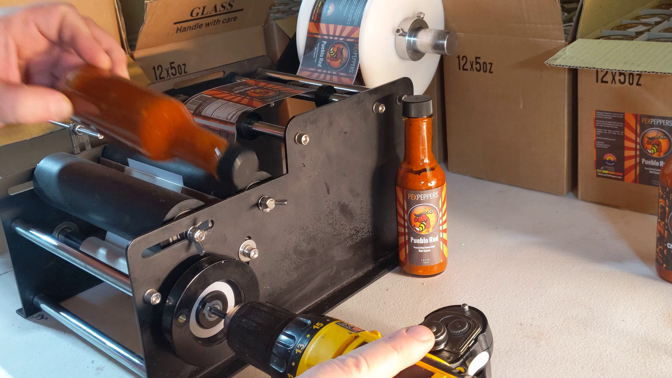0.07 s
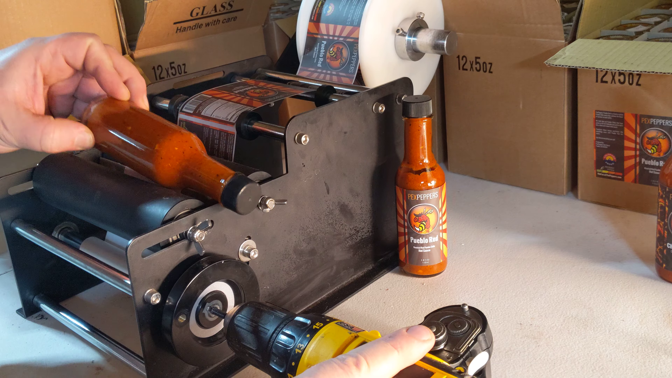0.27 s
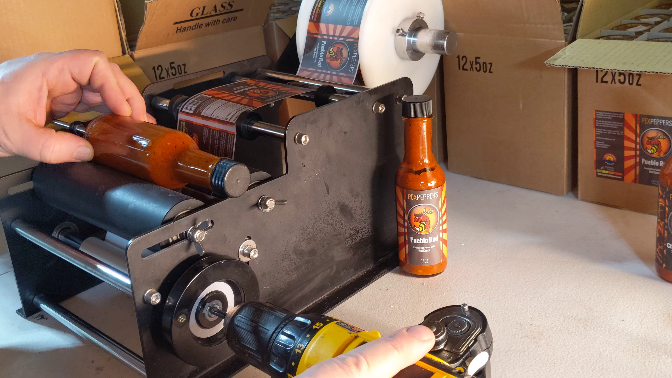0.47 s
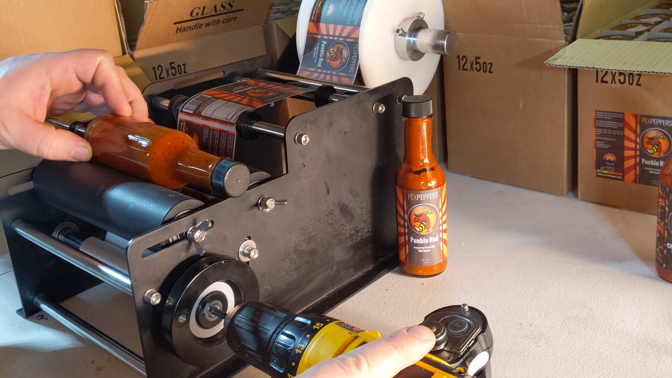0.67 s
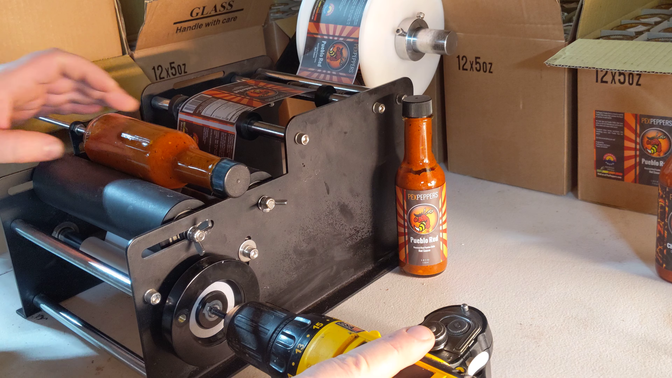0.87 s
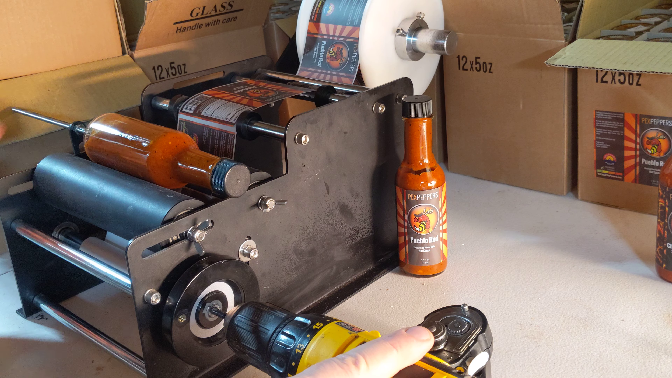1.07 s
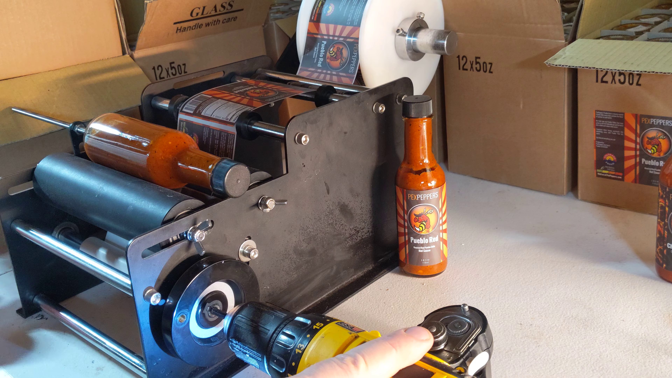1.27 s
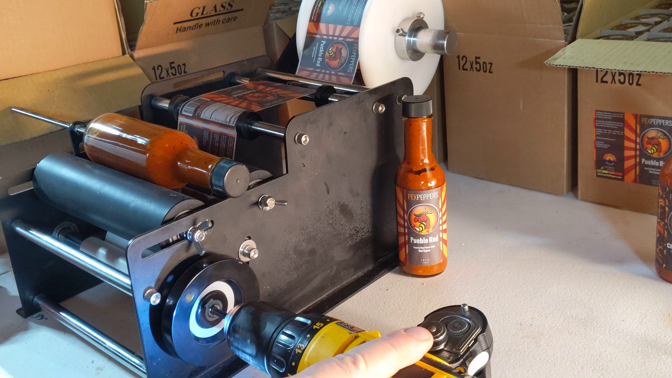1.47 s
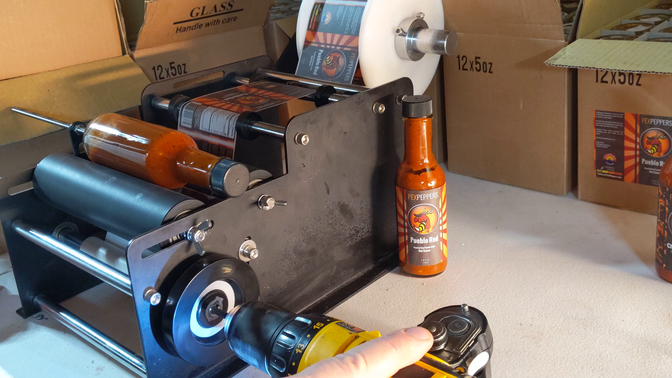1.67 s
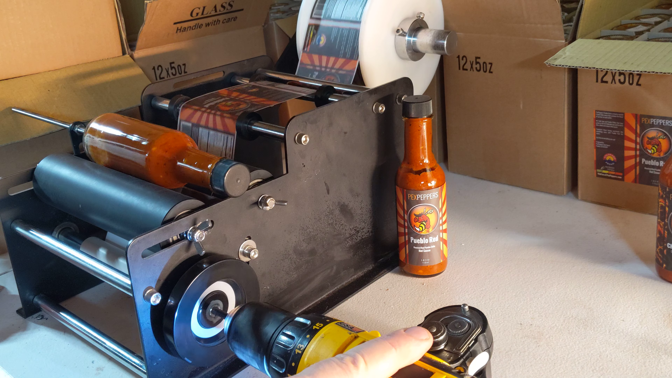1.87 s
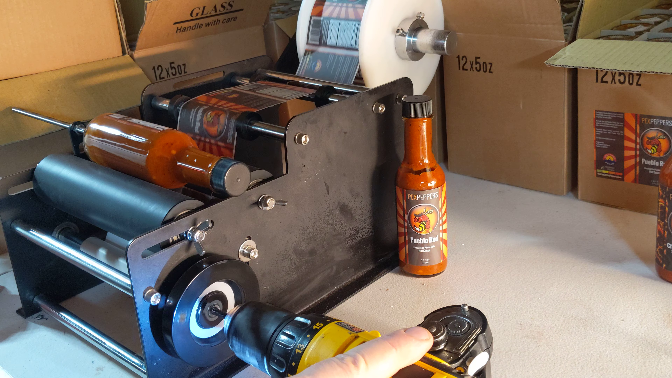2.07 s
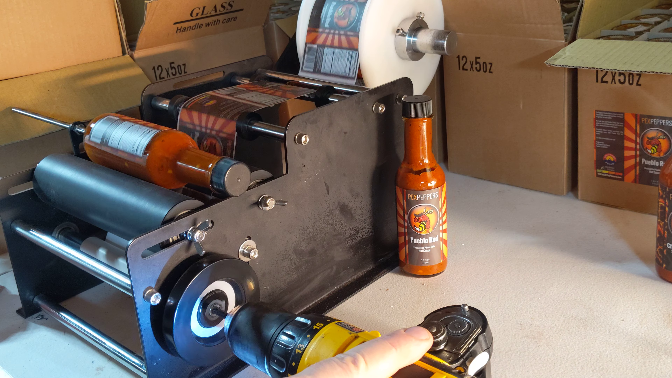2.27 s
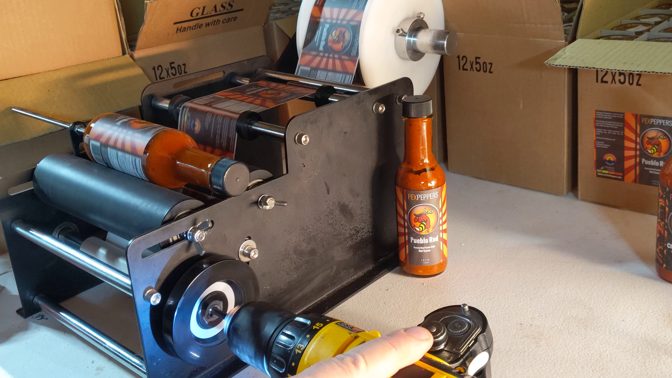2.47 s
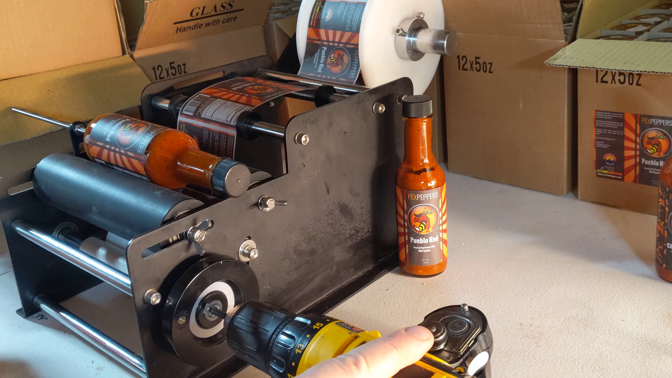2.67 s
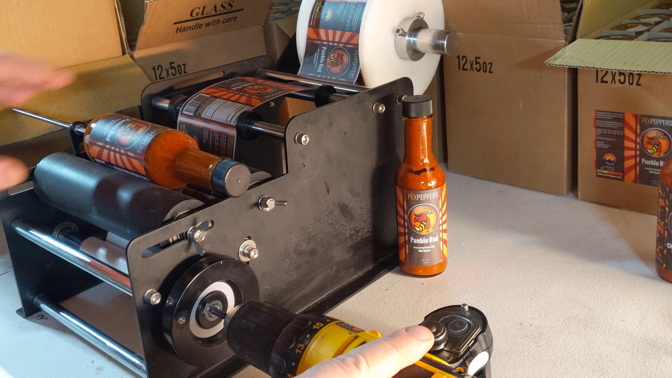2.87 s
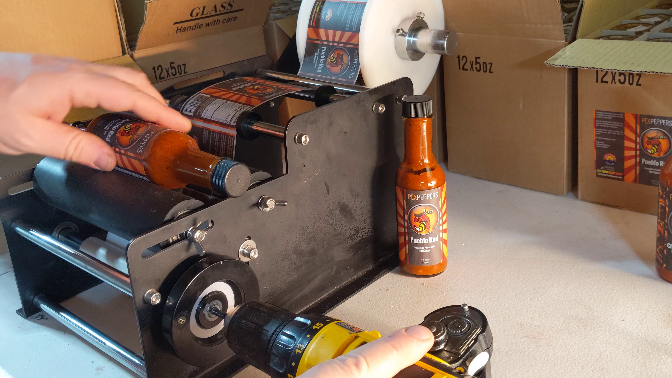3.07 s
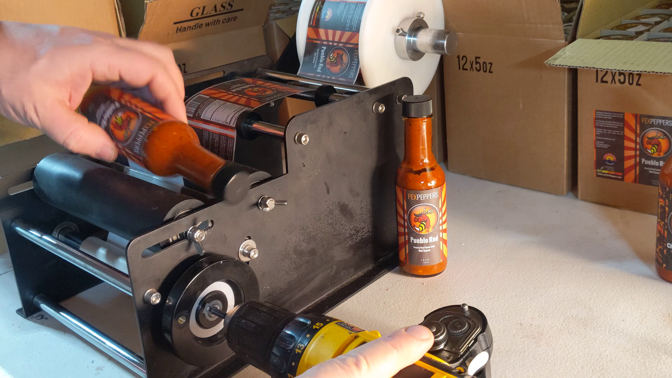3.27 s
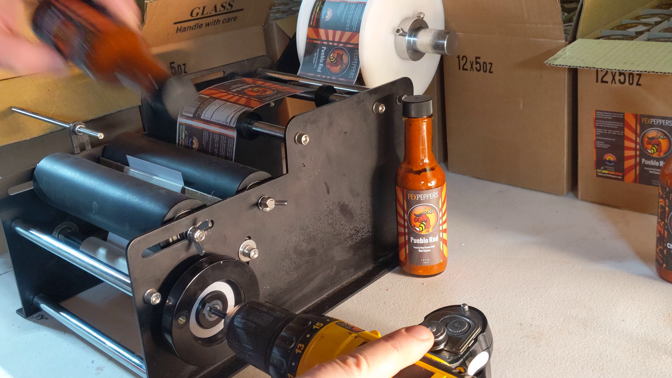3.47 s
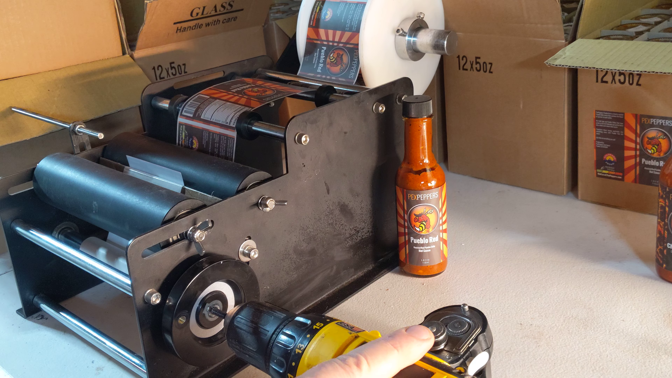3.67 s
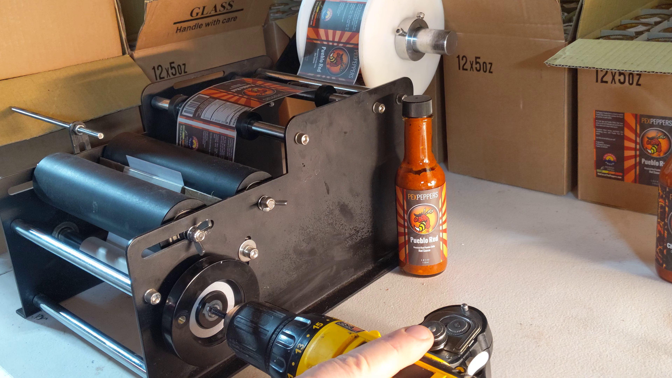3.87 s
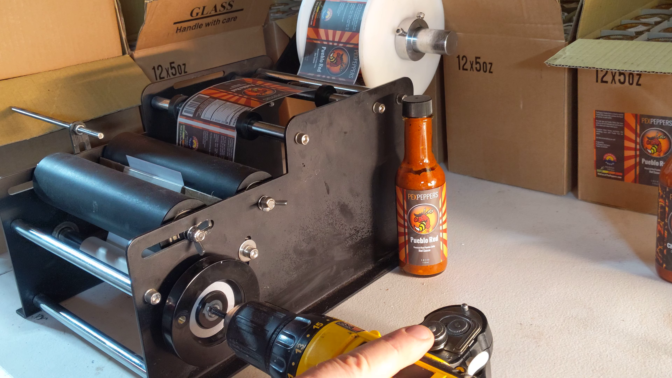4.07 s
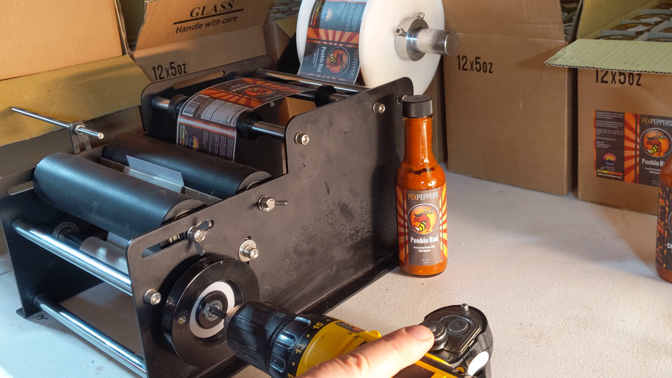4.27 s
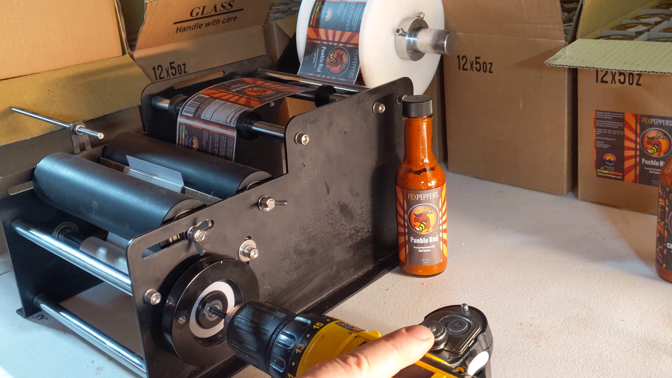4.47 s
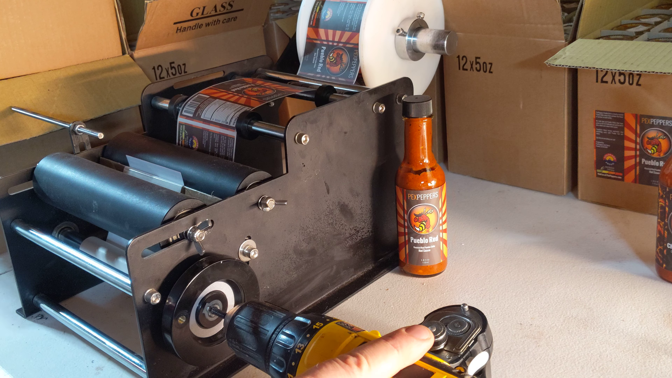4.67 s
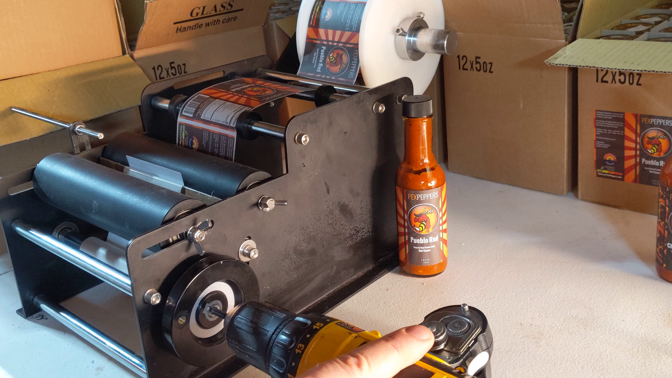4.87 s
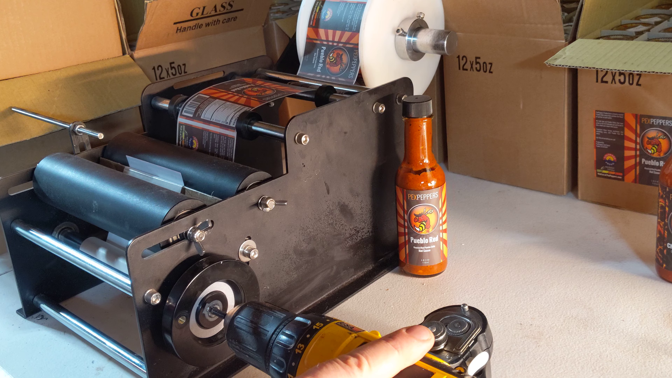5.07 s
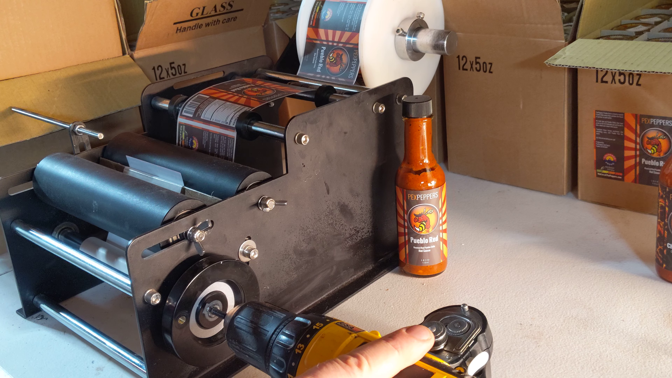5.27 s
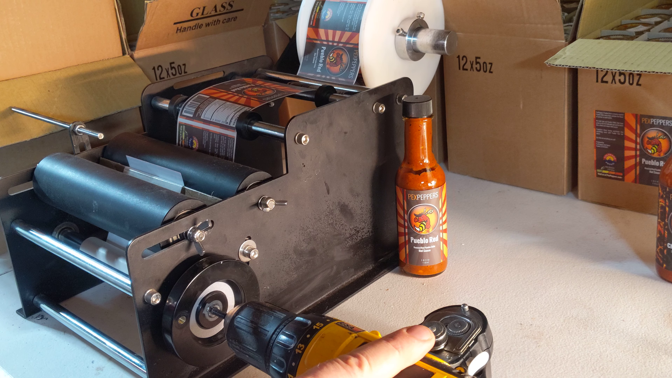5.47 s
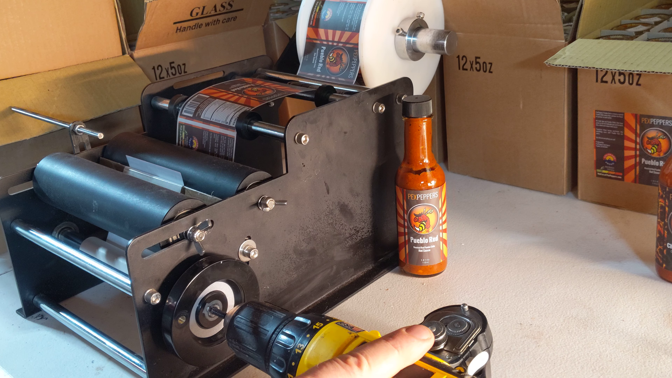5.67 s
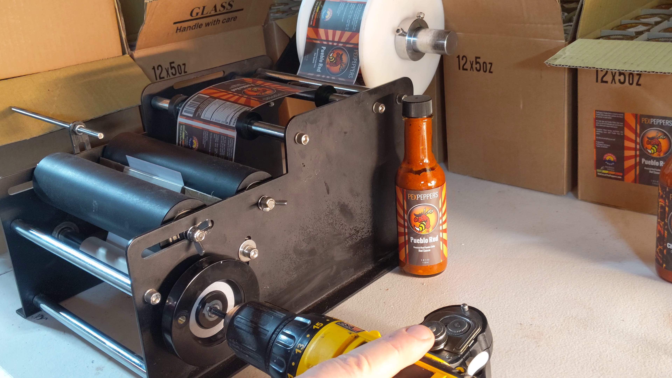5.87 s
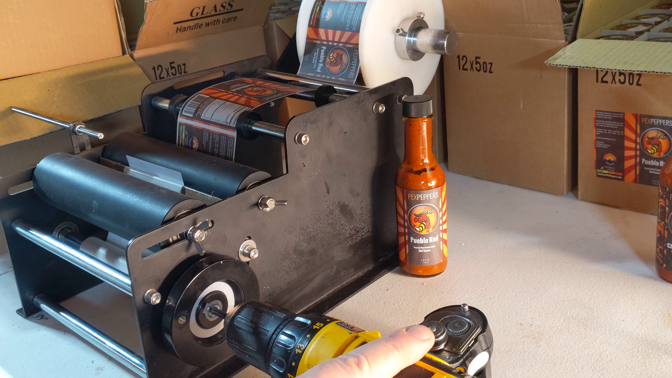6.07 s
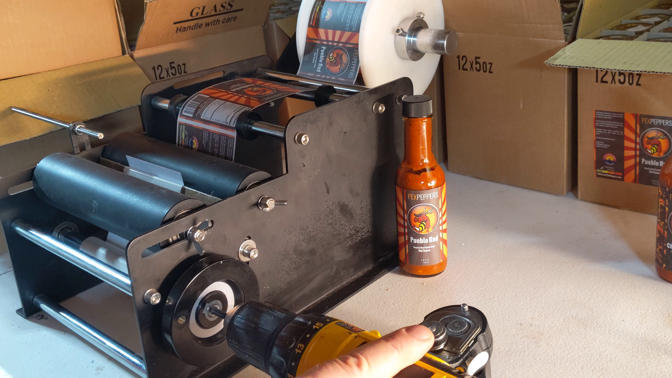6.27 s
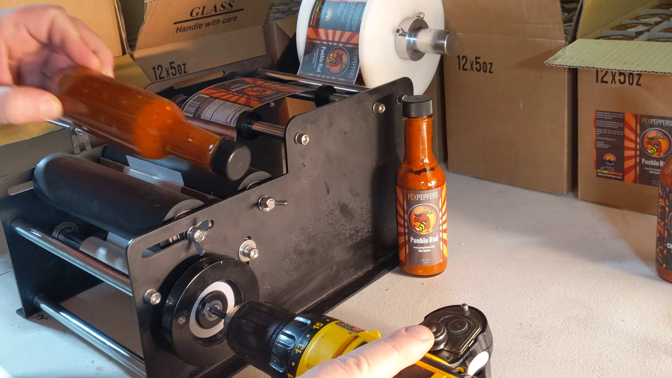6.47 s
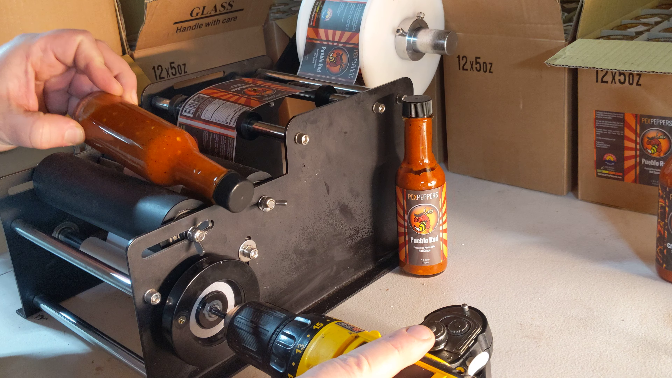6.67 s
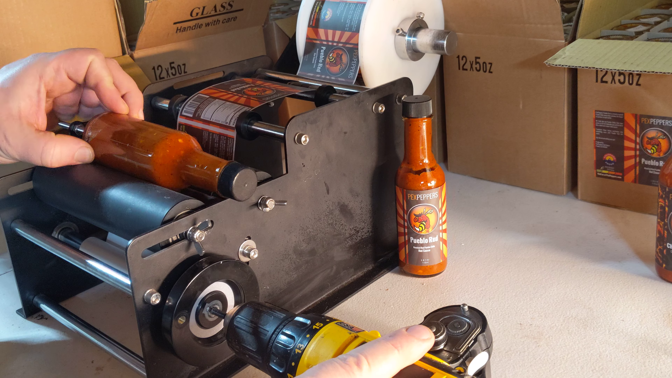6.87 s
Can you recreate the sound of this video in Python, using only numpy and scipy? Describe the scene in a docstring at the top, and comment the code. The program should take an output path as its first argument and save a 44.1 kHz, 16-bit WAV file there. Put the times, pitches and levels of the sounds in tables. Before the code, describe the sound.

A glass bottle knocks several times onto rollers in a steel frame. A cordless drill ticks and runs gently for about a second, a blip and then a longer squeeze, with a high whine over grinding gears. A sharp knock follows, then a bottle bumps and slides in a cardboard box to the left. Two more knocks on the rollers come near the end. Close microphone, small room with a faint hum.

```python
"""Drill-driven bottle labeller

Indoors at a table, close up on two microphone ports, in a small room with a faint hum. A cordless drill,
squeezed gently, turns the rubber rollers of a small labelling frame; its speed switch whines over motor
and gear noise. Glass bottles knock and slide on the rollers and, off to the left, in a carton."""
import sys
import numpy as np
from scipy import signal
from scipy.fft import rfft, irfft, next_fast_len
from scipy.io import wavfile
from scipy.ndimage import uniform_filter1d

SR = 44100
rng = np.random.default_rng(int(sys.argv[2]) if len(sys.argv) > 2 else 0)


def put_to_file(sound):
    """Save the sound as 16-bit audio at rate SR, in the file named by the first command-line argument."""
    columns = np.atleast_2d(sound).T  # one column per channel
    safe = np.clip(columns, -1, 1)
    whole_steps = np.round(safe * 32767)
    wavfile.write(sys.argv[1], SR, whole_steps.astype(np.int16))


N = 304731
T = np.arange(N) / SR
ABOVE_BASS = signal.butter(2, 260, "highpass", fs=SR, output="sos")  # both ports share the bass below

# modes of the steel frame, table and bottle: (frequency [Hz], level [dB], t60 [s])
FRAME_MODES = [(106.9, 3, 0.17), (162.2, 5.5, 0.21), (254.3, -6.5, .08), (418.7, -7.5, 0.19),
               (567, 6, 0.041), (880, -16.5, 0.023), (1029, -7.5, 0.13), (1195, 13, 0.015),
               (1402, -3.5, 0.12), (1562, 2.5, 0.067), (1760, -5.5, 0.044), (2060, -10.5, 0.097),
               (2587, 1.5, 0.036), (2676, -9.5, 0.05), (3050, -13, 0.1), (3220, -8.5, 0.026),
               (3490, -6, 0.12), (4700, -18, 0.029), (5126, -1, 0.087), (5400, -12, 0.067)]
# their ring over the clatter in each band of a knock, low to high: (level [dB])
FRAME_RING_DB = [7.5, -4.5, 4.5, -1.5, -0.5, -10]


def undb(db):
    return 10 ** (np.asarray(db) / 20)


def unit(x):
    return x / np.sqrt(np.mean(x ** 2))


def tone(hz):
    """Sine of rms 1 that follows a pitch curve."""
    return np.sqrt(2) * np.sin(2 * np.pi * np.cumsum(hz) / SR)


def curves(table, fade_s=.004):
    """A gate open from a table's first time to its last, and its other columns as curves."""
    times, *columns = np.transpose(table)
    gate = np.clip(np.minimum(T - times[0], times[-1] - T) / fade_s + 1, 0, 1)
    return gate, [np.interp(T, times, column) for column in columns]


def wander(rate_hz):
    """Random steps smoothed twice, rms 1."""
    hold = int(SR / rate_hz)
    steps = np.repeat(rng.standard_normal(N // hold + 1), hold)
    return unit(uniform_filter1d(uniform_filter1d(steps, hold), hold)[:N])


def noise(colour, size=N):
    """Noise of rms 1, coloured by rows of (frequency [Hz], level [dB])."""
    hz, db = np.transpose(colour)
    n = next_fast_len(size)
    log_hz = np.log(np.arange(n // 2 + 1) * SR / n + 1)
    gain = undb(np.interp(log_hz, np.log(hz), db, left=-60, right=-60))
    return unit(irfft(rfft(rng.standard_normal(n)) * gain, n)[:size])


def diffuse(colour, size=N):
    """Noise from all round the microphone: the difference between the ports has no bass."""
    side = signal.sosfilt(ABOVE_BASS, signal.sosfilt(ABOVE_BASS, noise(colour, size)))
    return noise(colour, size) + side * np.array([[1], [-1]])


def place(x, pan_db, lag):
    """Above the bass, pan_db favours the left port and a positive lag [samples] delays it."""
    upper = signal.sosfilt(ABOVE_BASS, x)
    ports = np.array([np.roll(upper, int(max(lag, 0))), np.roll(upper, int(max(-lag, 0)))])
    return x - upper + ports * undb(np.array([pan_db, -pan_db]) / 2).reshape(2, -1)


def room_tone():
    """Distant ventilation and mains hum."""
    # ventilation spectrum: (frequency [Hz], level [dB])
    ventilation = [(12, -28.5), (22, -5), (36, -11), (60, -8.5), (98, -10.5), (127, -16), (228, -21.5),
                   (301, -27), (434, -29), (472, -24.5), (738, -29.5), (873, -29), (1960, -37.5),
                   (2820, -29.5), (7520, -38.5), (16000, -45.5)]
    # mains partials: (frequency [Hz], level [dB])
    partials = [(240, -79), (480, -84.5)]
    hum = sum(undb(db + 2 * wander(5.6)) * tone(np.full(N, hz)) for hz, db in partials)
    return undb(-63.5 + .33 * wander(2.2)) * diffuse(ventilation) + hum


def knocks(hits, colour_db, modes, ring_db, lag, crack_s, clatter_db, pivot_band=2):
    """Each blow rings the same modes with its own weights, under a crack and a clatter of loose parts."""
    # the six bands of a knock: (low edge [Hz], high edge [Hz])
    bands = [(60, 300), (300, 800), (800, 2200), (2200, 4000), (4000, 6500), (6500, 15500)]
    bank = [signal.butter(2, edges, "bandpass", fs=SR, output="sos") for edges in bands]
    octaves = np.log2(np.prod(bands, 1) / np.prod(bands[pivot_band])) / 2
    clatter_colour = [(70, -4.5), (120, 10.5), (5000, -15.5), (10000, -11), (16000, -20.5)]
    hz, db, t60 = np.transpose(modes)[:, :, None]
    out, t = np.zeros((2, N + SR)), np.arange(SR // 4) / SR
    head = int(.02 * SR)  # the first 20 ms set each band's level
    for time_s, level_db, weight_db, hardness, knock_hz, pan_db, clatter_s in hits:
        # a heavy blow lifts the bands under the pivot band, a hard one those over it
        bass_db = weight_db * np.minimum(octaves, 0) / octaves[0]
        band_db = bass_db + hardness * np.maximum(octaves, 0) + colour_db + level_db
        strength, detune = rng.standard_normal((2, len(modes), 1))
        sines = np.sin(2 * np.pi * hz * (1 + .0047 * detune) * t)
        ring = np.sum(undb(db + 3.8 * strength) * sines * np.exp(-np.log(1000) * t / t60), 0)
        decay = np.exp(-t / crack_s) + undb(clatter_db) * np.exp(-t / clatter_s)
        clatter = decay * np.minimum(t / .0018, 1) * noise(clatter_colour, len(t))
        blow = 0
        for sos, part_db, share_db in zip(bank, band_db, ring_db):
            tones, grit = signal.sosfilt(sos, [ring, clatter])
            part = undb(share_db) * tones / np.std(tones[:head]) + grit / np.std(grit[:head])
            # neighbouring bands meet in opposite phase, so the sign alternates
            blow = -blow + undb(part_db) * part / np.std(part[:head])
        # the spot that is struck lifts its own pitch
        blow = blow + undb(.5) * signal.lfilter(*signal.iirpeak(knock_hz, Q=2.76, fs=SR), blow)
        start = int(time_s * SR)
        out[:, start:start + len(t)] += place(blow, pan_db, lag)
    return out[:, :N]


def roller_knocks():
    """A bottle knocks on the rollers and rings the steel frame."""
    # blows: (time [s], level [dB], weight [dB], hardness [dB/octave], pitch [Hz], pan [dB],
    # clatter decay [s])
    hits = [(.283, -27, 0.5, 2.5, 595, 5.5, 0.0091), (.324, -32, -2, 1, 1500, -2.5, 0.015),
            (.396, -38, -17, -12, 1500, -2, .016), (.452, -35, 9, 2.5, 910, -3, .032),
            (.564, -39.5, 4, -6, 496, -5, 0.016), (1.157, -61, -2, -11, 1180, 1, .012),
            (2.643, -45.5, -9, 8.5, 1680, -8, 0.0166), (3.311, -21.5, -11.5, -0.5, 1460, 2.5, 0.042),
            (6.707, -20, -13, 3, 2680, -3.5, 0.0052), (6.839, -30.5, -8, -1, 1440, -2.5, 0.032)]
    # colour of a blow, band by band: (level [dB])
    colour_db = [1.5, -1.5, -0.5, -7, -15.5, -22]
    return knocks(hits, colour_db, FRAME_MODES, FRAME_RING_DB, lag=-1, crack_s=.01, clatter_db=-4.5)


def table_bumps():
    """Dull bumps in the table, centred between the ports."""
    # bumps: (time [s], level [dB])
    bumps = [(0.868, -55), (2.699, -39), (3.124, -53)]
    # their bass-heavy colour, band by band: (level [dB])
    colour_db = [1, -15, -19, -26.5, -21.5, -20.5]
    pitch_hz, clatter_s = 160, .022
    hits = [(time_s, db, 0, 0, pitch_hz, 0, clatter_s) for time_s, db in bumps]
    return knocks(hits, colour_db, FRAME_MODES, FRAME_RING_DB, lag=-1, crack_s=.009, clatter_db=-7)


def drill_ticks():
    """The trigger and clutch tick, right of centre, and ring the frame."""
    # ticks: (time [s], level [dB], pan [dB])
    ticks = [(1.32, -51.5, -4), (1.501, -51, -6), (1.755, -32.5, -12.5), (2.617, -30, -2.5)]
    # their bright colour, band by band: (level [dB])
    colour_db = [-23, -14, -26, -22, -4, -13.5]
    # ring over clatter, band by band: (level [dB])
    ring_db = [0, -3, -3, 3, -4.5, -14.5]
    pitch_hz, clatter_s = 5360, .018
    hits = [(time_s, db, 0, 0, pitch_hz, pan_db, clatter_s) for time_s, db, pan_db in ticks]
    return knocks(hits, colour_db, FRAME_MODES, ring_db, lag=-1, crack_s=.009, clatter_db=-6.5)


def switch_whine():
    """Windings sing at the chopping rate; the shaft adds side tones. Returns whine and shaft tone."""
    # trigger squeezes: (start [s], let go [s], end [s], first pitch [Hz], settled pitch [Hz],
    # climb [s], creep [Hz/s], sag [Hz], octave level [dB], settling [s])
    squeezes = [(1.504, 1.733, 1.758, 5420, 5815, .035, 3, 600, -55, 0.079),
                (1.771, 2.586, 2.64, 4450, 4990, .042, 84, 767, -55, 0.027)]
    # the whine swells and swings between the ports: (time [s], level [dB], pan [dB])
    swells = [(1.5, -36, -1), (1.508, -33, -2), (1.548, -30, -7), (1.605, -36.5, -1), (1.632, -29, -13),
              (1.69, -35, 0), (1.728, -26.5, -9.5), (1.758, -43, -7.5), (1.782, -33.5, -2),
              (1.83, -41.5, -12), (1.864, -27, 7.5), (1.89, -40.5, -8), (1.925, -34, -13.5),
              (2.02, -31, 2.5), (2.05, -26.5, -.5), (2.28, -26, 2), (2.405, -26, -5), (2.445, -36, -8.5),
              (2.584, -27.5, 1), (2.6, -35, -6), (2.64, -43, -4)]
    ragged_floors_db, cycles_per_turn = (-14, -33), 12
    turning, _ = curves([[1.85], [2.62]], fade_s=.043)
    _, (level_db, pan_db) = curves(swells)
    out = 0
    for squeeze, floor_db in zip(squeezes, ragged_floors_db):
        start, let_go, end, first_hz, settled_hz, climb_s, creep, sag_hz, octave_db, settle_s = squeeze
        gate, _ = curves([[start], [end]], fade_s=.0024)
        t = np.maximum(T - start, 0)
        release = np.clip((T - let_go) / (end - let_go), 0, 1)
        hz = settled_hz - (settled_hz - first_hz) * np.exp(-t / climb_s)
        hz = hz + creep * t - sag_hz * release ** 2
        shaft_hz = hz / cycles_per_turn
        flutter = turning * tone(shaft_hz / 2)
        # the chopping is ragged until the current settles and again as it dies
        ragged = .7 * (undb(floor_db) + np.exp(-t / settle_s) + undb(2) * np.sqrt(release))
        whine = tone(hz) * (1 + undb(-41) * flutter + ragged * wander(500))
        whine += ragged * wander(550) * tone(hz - 250)
        whine += turning * undb(-19 + 2 * wander(40)) * tone(hz + shaft_hz)
        overtones = (1 + .6 * wander(400) + .6 * flutter) * (tone(2 * hz) + undb(-14) * tone(3 * hz))
        out = out + place(gate * undb(level_db) * whine, pan_db, lag=-2)
        out = out + place(gate * undb(octave_db) * overtones, pan_db=-11.5, lag=-1)
    return out, turning * tone(shaft_hz)


def motor_and_gears(shaft_tone):
    """Shaft and roller drive hum, gears grind, brushes hiss, and the running parts shake the table."""
    # roller drive under changing load: (time [s], fundamental [Hz])
    roller_pitch = [(1.77, 292), (1.85, 298), (1.93, 372), (2.02, 357), (2.2, 381), (2.27, 364), (2.5, 421),
                    (2.572, 365), (2.66, 415)]
    # its partials: (multiple, level [dB])
    roller_partials = [(2, -60), (3, -53), (4, -53.5)]
    # running noise, which grind, hiss and rumble all track: (time [s], level [dB])
    running = [(1.5, -61), (1.543, -46.5), (1.74, -50), (1.765, -41.5), (2.265, -39.5), (2.56, -39),
               (2.65, -39.5), (2.723, -48.5), (2.76, -62)]
    # gear spectrum: (frequency [Hz], level [dB])
    gears = [(200, -8), (400, 3), (900, -1.5), (1400, 0), (2200, -8.5), (3000, -1), (4200, -7), (5300, 6),
             (6500, -11)]
    # brush spectrum: (frequency [Hz], level [dB])
    brushes = [(3500, -9), (5500, -11.5), (7200, 10), (8500, 1.5), (10000, 9.5), (11500, 1.5), (13500, 0.5),
               (15500, 3)]
    # the table shudders when the torque changes: (time [s], level [dB], decay [s])
    shudders = [(1.52, -46.5, 0.13), (1.6, -37, 0.046), (1.765, -42.5, 0.04), (2.55, -50, 0.034),
                (2.65, -50.5, 0.082)]
    hum = undb(-48.5 + 2 * wander(20)) * shaft_tone
    rolling, (roller_hz,) = curves(roller_pitch, fade_s=.014)
    roller_hz = roller_hz * (1 + .00816 * wander(80))
    for multiple, db in roller_partials:
        hum += rolling * undb(db + 2 * wander(30)) * tone(multiple * roller_hz)
    gate, (run_db,) = curves(running)
    grind = undb(run_db + 1.57 * wander(200)) * noise(gears)
    # the hiss leaves by many vents and reaches the ports unalike
    hiss = undb(run_db - 7 + wander(300)) * diffuse(brushes) * undb([[-2], [2]])
    shake = gate * undb(run_db - 14.5)
    for time_s, db, decay_s in shudders:
        onset = np.clip((T - time_s) / .012 + 1, 0, 1)
        shake += undb(db) * onset * np.exp(-np.maximum(T - time_s, 0) / decay_s)
    # the table's two lowest modes lie at 100 and 170 Hz
    rumble = shake * noise([(60, -36.5), (100, -1), (130, -8.5), (170, 1), (230, -9.5), (320, -9.5)])
    return place(hum + gate * grind + rumble, pan_db=-2.5, lag=1) + gate * hiss


def slides():
    """Glass and fingers stick and slip on rubber and card, left of centre: noise in uneven grains."""
    # rubs: (time [s], length [s], scrape level [dB], hiss level [dB], swell from start to end [dB])
    rubs = [(3.056, 0.14, -73, -75, -4), (3.282, 0.029, -64.5, -58, 7.5), (4.147, 0.11, -67.5, -62.5, -9),
            (4.294, 0.071, -50, -58, -15), (4.403, 0.098, -67, -75, 0), (4.558, 0.18, -58, -64, 6),
            (4.948, 0.11, -56, -70, -4.5), (5.09, 0.05, -70, -65, -12), (5.17, 0.11, -62, -67, -13),
            (5.31, 0.087, -51.5, -60.5, -9), (5.419, 0.093, -65, -71.5, 6.5), (5.516, 0.13, -67, -69, -10),
            (5.652, 0.11, -50, -58, -12), (5.788, 0.2, -60, -58, -21), (6.519, 0.2, -74.5, -76.5, 10)]
    scrape_colour = [(150, 1.5), (300, -5.5), (700, -8), (1500, -14), (3500, -10.5)]
    hiss_colour = [(1500, -40.5), (3300, 1), (5500, -5), (6600, -9), (7700, -2), (12000, -6.5),
                   (15500, -14.5)]
    scrape = unit(undb(1.8 * wander(190)) * noise(scrape_colour))
    hiss = unit(undb(.83 * wander(340)) * noise(hiss_colour))
    out = 0
    for time_s, length_s, scrape_db, hiss_db, swell_db in rubs:
        gate, (db,) = curves([(time_s, 0), (time_s + length_s, swell_db)], fade_s=.025)
        out = out + gate * (undb(scrape_db + db) * scrape + undb(hiss_db + db) * hiss)
    return place(out, pan_db=2.8, lag=-7)


def carton_knocks():
    """A bottle knocks about in the carton; the sound reaches the left port first."""
    # blows: (time [s], level [dB], weight [dB], hardness [dB/octave], pitch [Hz], pan [dB],
    # clatter decay [s])
    hits = [(4.177, -49, -0.5, -1.5, 900, 4, 0.072), (4.223, -49.5, -4, -1, 279, -7, 0.035),
            (4.251, -44.5, 0, -3, 278, 2, 0.04), (4.308, -45.5, 0.5, 2.5, 494, -7.5, 0.027),
            (4.441, -56.5, -7, 0.5, 1000, 2, 0.017), (4.462, -51.5, -6, -1, 597, -9, 0.011),
            (4.512, -51.5, 2, 0.5, 197, 2, .024), (4.545, -53, 4, 1, 199, 3.5, 0.022),
            (4.697, -30, 12.5, 3.5, 706, 3, 0.028), (4.704, -22.5, 2, 0.5, 560, 15, 0.011),
            (4.824, -26.5, 0.5, -.5, 397, 10, 0.018), (5.08, -39.5, -2, -4, 202, 6.5, 0.008),
            (5.158, -52, 5, 0.5, 200, -1, .024), (5.295, -54, -8, 0, 1400, -11, 0.03),
            (5.319, -46, -25, 0.5, 1400, -6.5, 0.02), (5.348, -45, -2.5, -5.5, 226, 5, 0.014),
            (5.498, -62, -4, 4, 800, -10.5, 0.071), (5.559, -53.5, -14, -5, 600, 9, .017),
            (5.652, -37.5, -7, -1.5, 500, -2, 0.039), (5.729, -53, -15, 1, 700, -11, .027),
            (5.781, -43.5, -6, 2.5, 596, 6.5, 0.074)]
    # colour of a blow, band by band: (level [dB])
    colour_db = [1, -3, -5.5, -4, -19, -19]
    # cardboard walls and the floor under them: (frequency [Hz], level [dB], t60 [s])
    modes = [(105, 0, 0.22), (135, -2, 0.16), (160, 2, 0.16), (196.2, 5.5, 0.16), (252, -7, 0.23),
             (305, -6.5, 0.043), (384, 1, 0.02), (505, -10.5, 0.096), (568, -2, 0.045), (660, -2, 0.048),
             (820, -10, 0.057), (1220, -6.5, 0.064), (1681, 8.5, 0.18), (2770, 21.5, 0.019),
             (3200, -24, 0.032)]
    # ring over clatter, band by band: (level [dB])
    ring_db = [5.5, -3, -9, -5.5, -24.5, -26.5]
    return knocks(hits, colour_db, modes, ring_db, lag=-10, crack_s=.015, clatter_db=-3.5, pivot_band=1)


def room(direct, wet_db):
    """The direct sound plus the small room's diffuse tail, whose bands die at their own pace."""
    # reverberation: (band centre [Hz], t60 [s])
    decays = [(100, 0.4), (400, 0.3), (1500, 0.2), (5000, 0.38), (12000, 0.15)]
    t, tail = np.arange(int(.8 * SR)) / SR, 0
    wash = diffuse([(40, .00052), (16000, .0041)], len(t))
    for hz, t60 in decays:
        sos = signal.butter(1, [hz / 2, min(hz * 2, 18000)], "bandpass", fs=SR, output="sos")
        tail = tail + signal.sosfilt(sos, wash) * np.exp(-np.log(1000) * t / t60)
    tail = tail * np.clip((t - .003) / .0079, 0, 1)
    tail = tail / np.sqrt(np.sum(tail ** 2) / 2)
    return direct + undb(wet_db) * signal.fftconvolve(direct.mean(0)[None], tail, axes=1)[:, :N]


def scene():
    """At the microphone the whine sounds closest; knocks and slides carry the most room."""
    whine, shaft_tone = switch_whine()
    frame = undb(-8.5) * (roller_knocks() + drill_ticks() + table_bumps())
    carton = undb(-5) * carton_knocks()
    drill = room(whine, wet_db=-13) + room(undb(-2.5) * motor_and_gears(shaft_tone), wet_db=-5)
    handling = room(frame + carton + slides(), wet_db=-3)
    return drill + handling + room_tone()


def record(dry):
    """The recorder cuts the top steeply above 15850 Hz."""
    return signal.sosfilt(signal.ellip(10, .2, 80, 15850, fs=SR, output="sos"), dry)


dry = scene()
out = record(dry)
put_to_file(out)
```